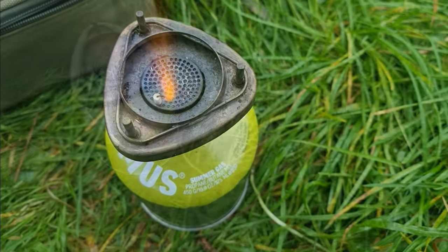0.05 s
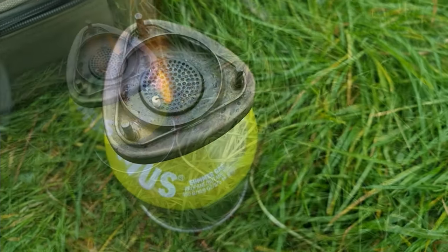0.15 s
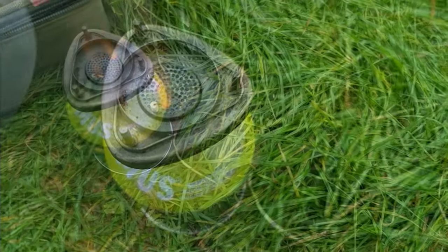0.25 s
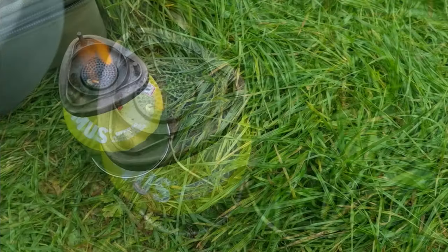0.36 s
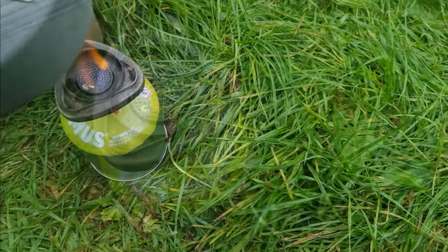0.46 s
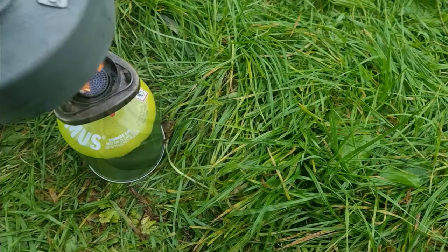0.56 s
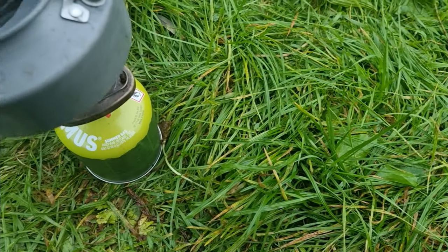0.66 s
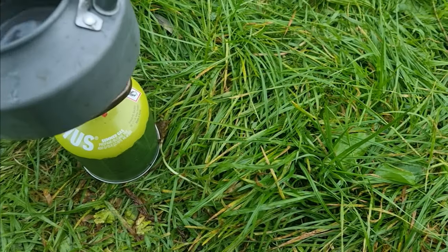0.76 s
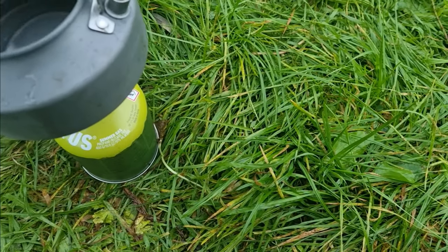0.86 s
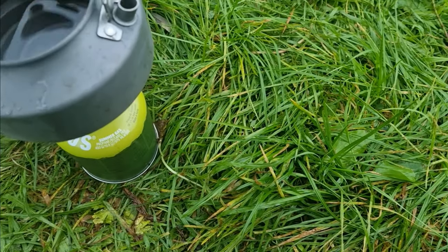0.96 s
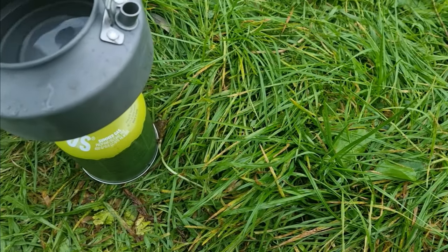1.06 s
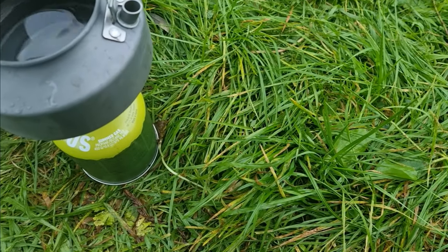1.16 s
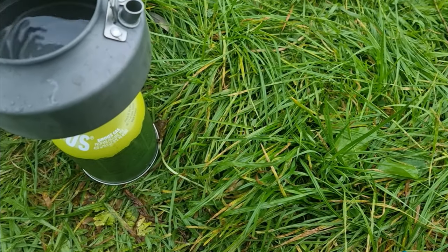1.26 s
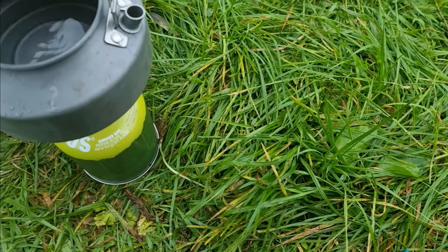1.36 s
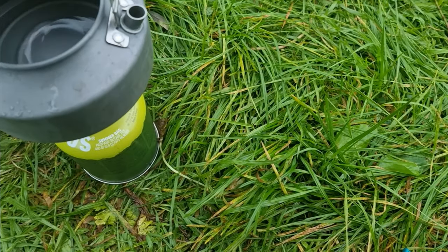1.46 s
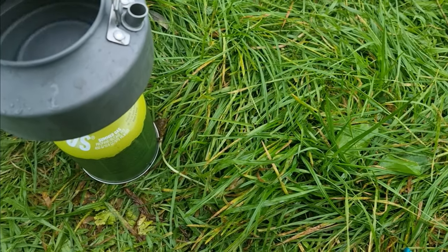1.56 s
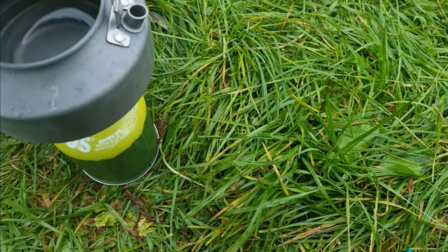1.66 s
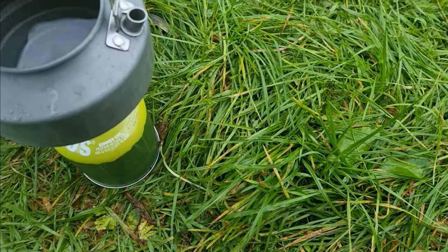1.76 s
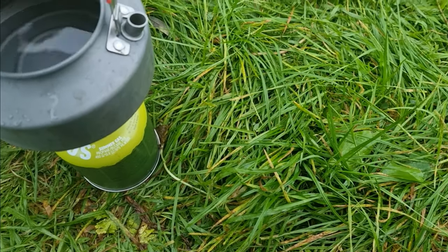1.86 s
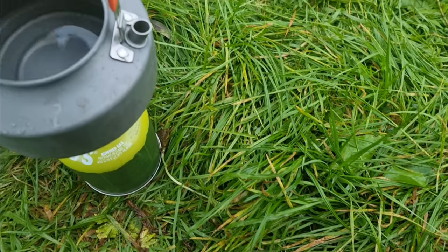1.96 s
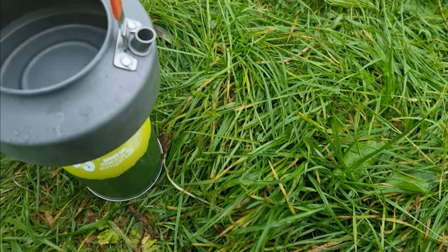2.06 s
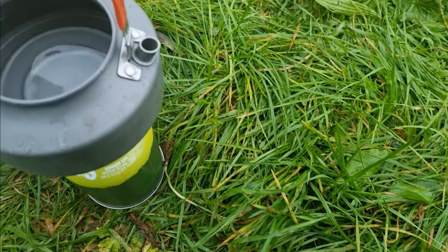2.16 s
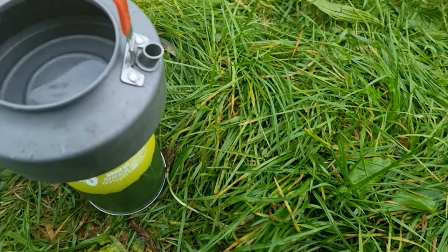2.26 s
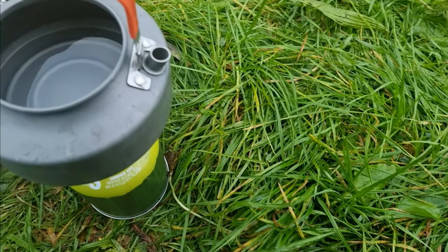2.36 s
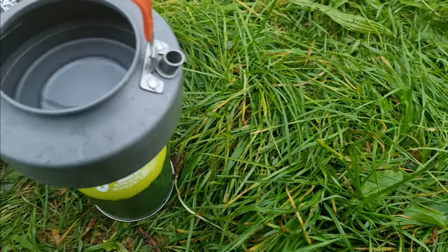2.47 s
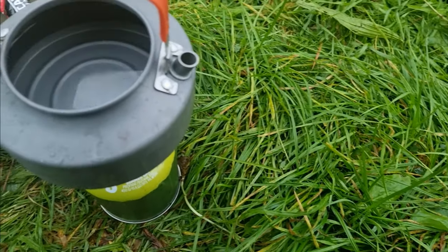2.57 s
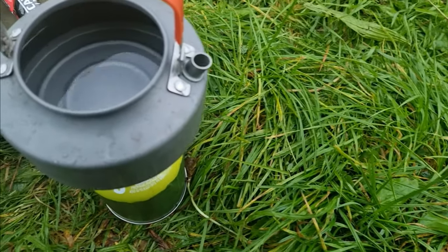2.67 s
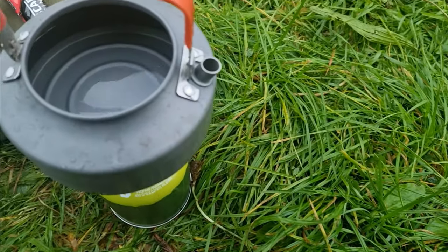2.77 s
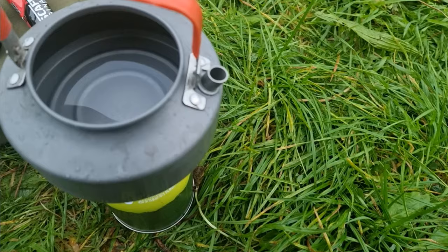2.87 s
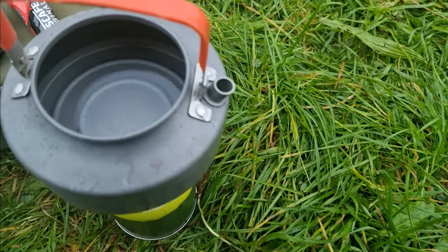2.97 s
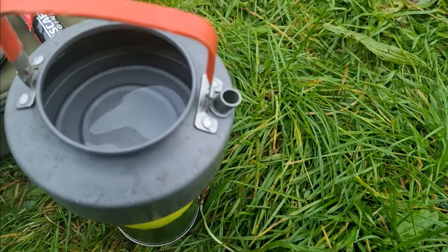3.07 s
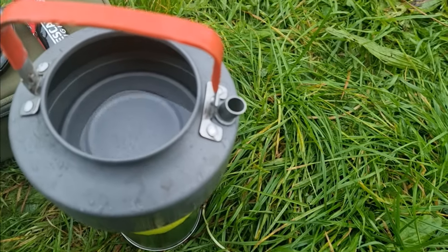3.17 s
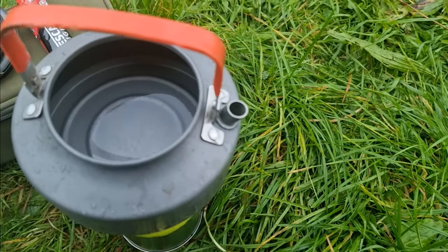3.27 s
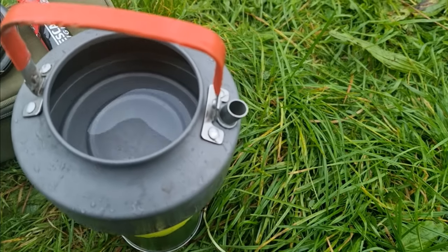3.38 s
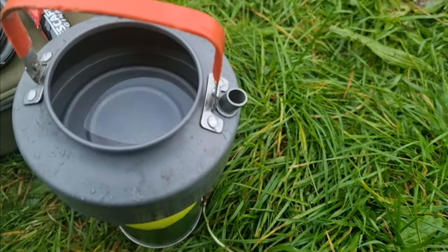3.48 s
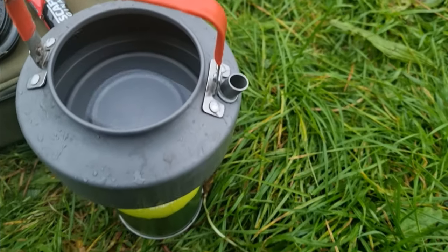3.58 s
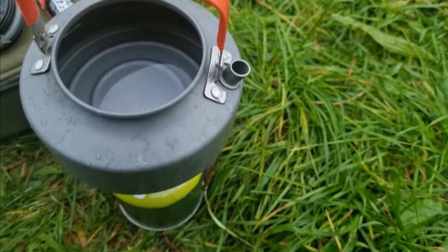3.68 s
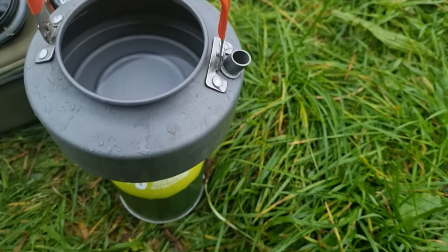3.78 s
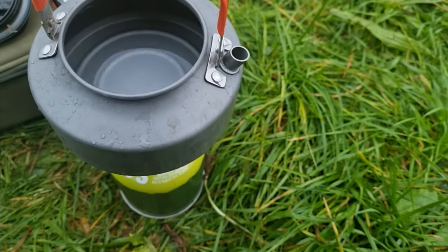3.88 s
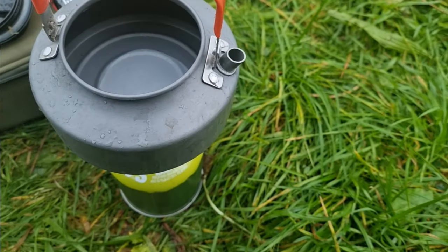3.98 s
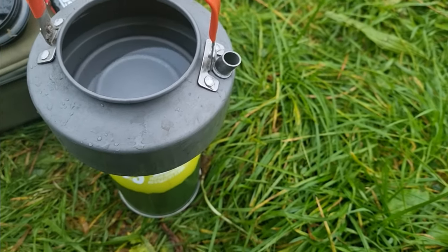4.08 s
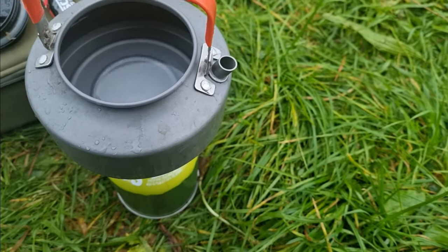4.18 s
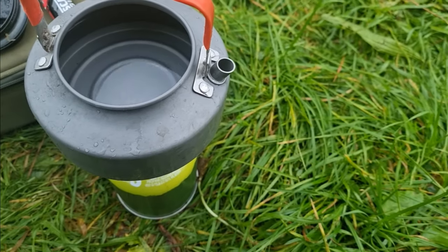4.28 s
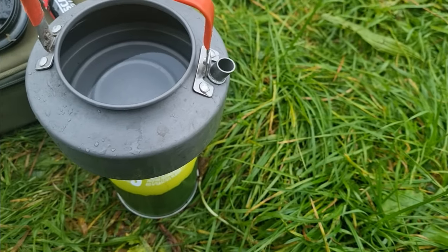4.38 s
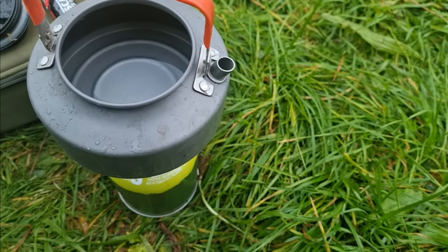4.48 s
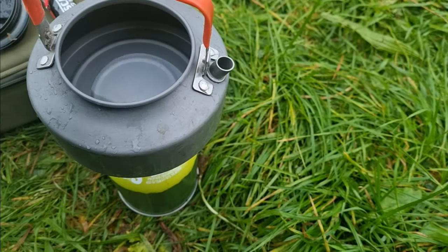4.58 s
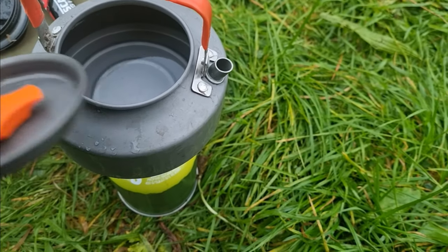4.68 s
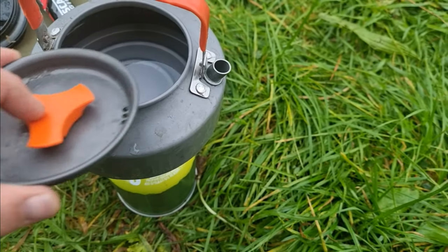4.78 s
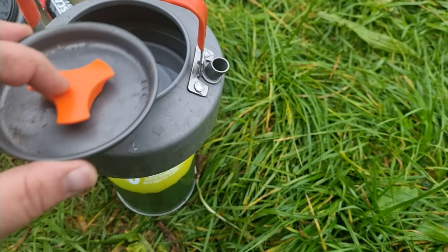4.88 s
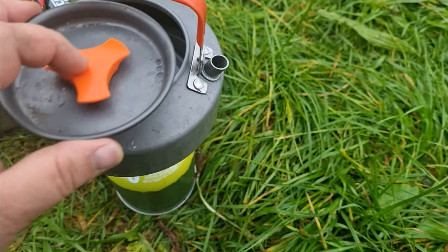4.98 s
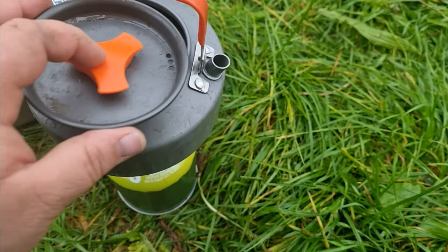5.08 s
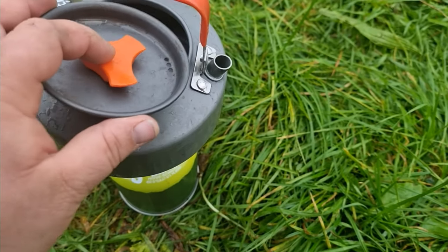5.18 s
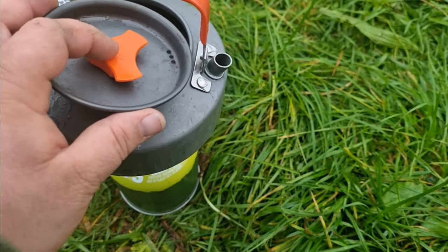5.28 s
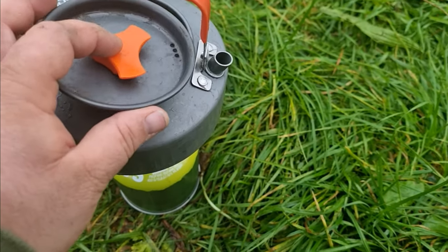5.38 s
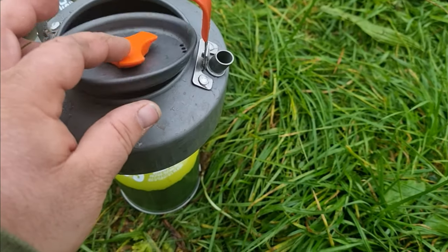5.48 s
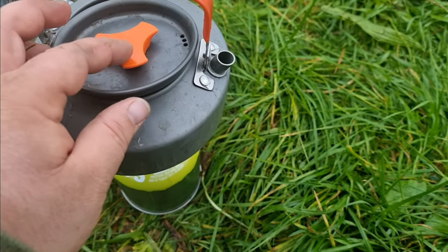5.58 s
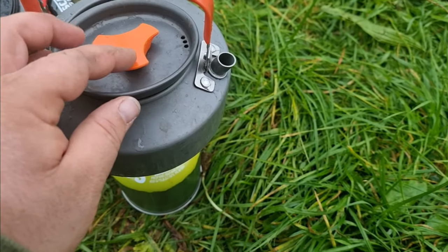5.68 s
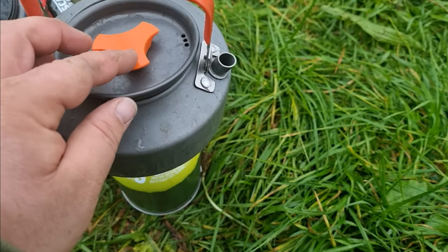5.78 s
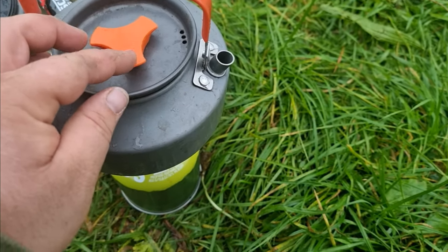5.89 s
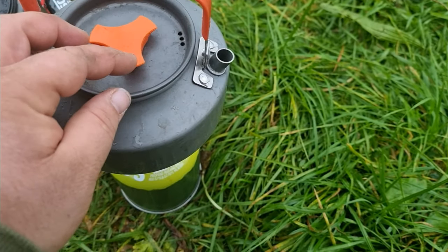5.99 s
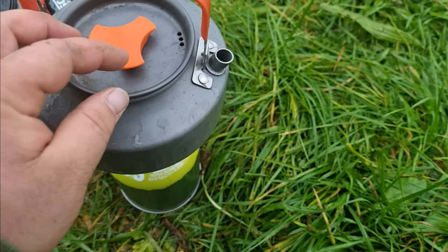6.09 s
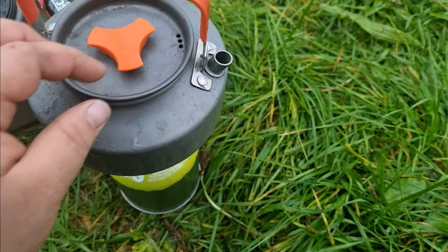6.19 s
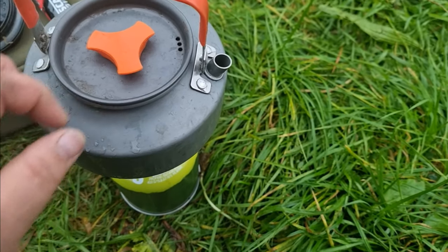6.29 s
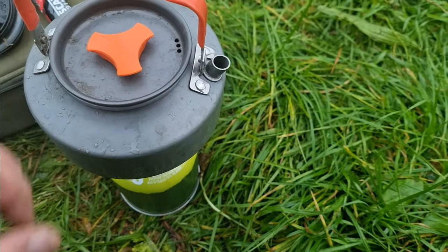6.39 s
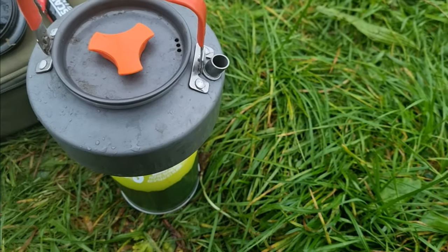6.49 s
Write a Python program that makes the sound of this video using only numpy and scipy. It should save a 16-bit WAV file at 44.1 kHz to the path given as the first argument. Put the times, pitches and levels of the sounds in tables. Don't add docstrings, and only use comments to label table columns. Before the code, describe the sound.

Close gas stove hiss with low flame rumble, one hollow metal clunk near one second, then a burst of lid rattling and a final hard click.

```python
import sys
import numpy as np
from scipy import signal
from scipy.fft import rfft, irfft
from scipy.io import wavfile
from scipy.ndimage import uniform_filter1d

SR = 44100
rng = np.random.default_rng(int(sys.argv[2]) if len(sys.argv) > 2 else 0)


def generate_wav(signal):
    frames = np.transpose(np.atleast_2d(signal))
    scaled = np.clip(frames, -1, 1) * 32767
    pcm = np.round(scaled).astype(np.int16)
    wavfile.write(sys.argv[1], SR, pcm)


N = 288414

# time_s, rumble_db
FLAME_LEVEL = [(0.0, -43), (0.05, -37.5), (0.2, -43), (0.27, -39.5), (0.33, -43.5), (0.44, -44.5),
               (0.49, -41.5), (0.6, -44.5), (0.65, -43.5), (0.78, -45.5), (0.82, -39), (0.87, -44),
               (1.13, -43.5), (1.24, -45), (1.33, -44.5), (1.42, -42.5), (1.55, -45), (1.78, -43.5),
               (2.18, -44.5), (2.24, -42.5), (2.31, -39.5), (2.35, -47), (2.4, -44), (2.42, -46),
               (2.6, -44), (2.64, -51), (2.71, -42), (2.75, -42.5), (3.02, -44.5), (3.06, -42), (3.22, -46),
               (3.28, -42), (3.31, -47), (3.35, -43), (3.44, -43), (3.7, -47.5), (3.86, -47), (3.92, -39),
               (3.97, -47), (4.02, -41), (4.08, -43), (4.15, -41), (4.19, -43), (4.35, -44), (4.48, -40),
               (4.53, -48.5), (4.66, -40.5), (4.73, -45.5), (4.81, -44), (4.94, -44.5), (4.97, -42),
               (5.08, -47), (5.21, -44), (5.26, -47.5), (5.61, -47), (5.66, -48.5), (6.01, -47),
               (6.08, -51.5), (6.16, -47), (6.28, -49.5), (6.38, -47), (6.54, -47.5)]
# frequency_hz, density_db_per_hz
RUMBLE_SPECTRUM = [(12, -65), (20, -31), (45, -6.5), (65, 4), (114, -9), (211, -10.5), (248, -12.5),
                   (288, -17), (334, -16), (500, -33.5), (650, -52), (1100, -120)]
# frequency_hz, coherence_0_to_1
PORT_LIKENESS = [(60, 1), (250, 0.74), (500, 1), (1500, 0.29), (3000, 0.83), (6000, 0.64), (9000, .65),
                 (15000, .5)]
# frequency_hz, phase_rad
PORT_PHASE = [(60, -0.85), (300, -.5), (600, -4.5), (900, -5), (1500, -3), (2200, -5.5), (2800, -5),
              (4000, -5), (5500, -4.5), (7500, -4.5), (10000, -8), (15000, -3.5)]

# start_s, blow_db, drum_pitch_hz, drum_db, sizzle_db, left_over_right_db
SET_DOWN = [
    (1.0788, -10, 789, -4.5, -19.5, 5),
]
# start_s, blow_db, drum_pitch_hz, drum_db, sizzle_db, left_over_right_db
BOUNCES = [
    (1.266, -19, 833, -26.5, -34, 3),
    (1.402, -39, 820, -49, -62, 3.6),
    (1.428, -36.5, 860, -42, -62, 3.7),
    (3.287, -47, 774, -74, -62, 5.0),
]
# start_s, blow_db, drum_pitch_hz, drum_db, sizzle_db, left_over_right_db
LID_KNOCKS = [(5.221, -23, 830, -61, -32, 6.8), (5.228, -6.5, 833, -24, -21, .6),
              (5.2374, -17, 800, -19, -45, 7.5), (5.434, -46, 800, -35, -58, 4.3),
              (5.4684, -19.5, 810, -38, -30, 8.2), (5.473, -14, 794, -46, -23, 7),
              (5.4765, -3, 715, -18, -17, .6), (5.4863, -11, 755, -45, -28, 4.0),
              (5.4964, -9, 765, -15, -17, 5.7), (5.5086, -4, 700, -34, -15, 4.6),
              (5.5121, -10, 732, -25, -20.5, 6.6), (5.5264, -8.5, 724, -24, -16.5, 4.7),
              (5.5374, -9.5, 690, -27, -22.5, 6.5), (5.5484, -10.5, 648, -23, -29, 5.5),
              (5.5652, -29, 650, -26, -39, 6.5), (5.9298, -22.5, 607, -40, -40, 6.6),
              (5.9481, -23, 580, -46, -42.5, 7.0), (5.9643, -10, 576, -37, -25, 11),
              (5.971, -1, 571, -25, -32, 3.6), (5.9811, -20, 599, -20.5, -17, 2.5),
              (5.9884, -9.5, 574, -23, -20.5, 3), (6.008, -7, 600, -37.5, -22.5, 8.6),
              (6.0174, -18.5, 693, -33, -50, 7.4)]
# start_s, blow_db, drum_pitch_hz, drum_db, sizzle_db, left_over_right_db
LID_TAPS = [
    (5.7234, -32, 703, -52, -38, 7.5),
    (5.7367, -32, 703, -39, -35, 13),
    (5.7845, -34, 690, -36, -45, 9.9),
    (5.729, -35, 650, -58, -50, 9.6),
    (5.885, -16, 830, -33, -30, 8.1),
]
# time_s, scrape_db, drum_pitch_hz
LID_SLIDES = [
    [(5.24, -26, 830), (5.3, -44, 816), (5.4, -51, 792.5), (5.46, -47, 785)],
    [(5.465, -30, 750), (5.49, -23.5, 690), (5.55, -28.5, 670), (5.58, -28.5, 630), (5.61, -39, 620),
     (5.66, -61, 616)],
    [(5.885, -26, 635), (5.93, -38.5, 594), (5.96, -31, 560), (5.975, -21.5, 566), (6.015, -20, 593),
     (6.04, -52, 670)],
]
# center_s, level_db, pitch_hz
HAND_THUMP = [
    (5.197, -31, 83.33),
]

# frequency_hz, level_db, t60_s
KETTLE_MODES = [(690, -21, 0.032), (772, -21, .3), (900, -15, 0.025), (1071, 2.5, 0.058),
                (1140, 0.5, 0.063), (1290, -2, .05), (1607, -23, 0.47), (1600, -2, 0.076),
                (2100, -8, 0.032), (2286, -4.5, 0.079), (2690, -12.5, 0.051), (3050, -11, .04),
                (3273, -10, .11), (3500, -6, 0.055), (4020, -20, .05)]
# frequency_hz, level_db, t60_s
ROCKING_MODES = [(782, -6, .12), (945, -9.5, 0.035), (1117, -3.5, 0.14), (1250, -7, 0.086),
                 (1584, -18, 0.23), (1785, -1, 0.054), (2375, -4.5, 0.079), (3300, -11, .04)]
# frequency_hz, level_db, t60_s
LID_MODES = [(1150, -9, 0.024), (1293, -12, 0.052), (1566, -12, 0.13), (1950, -3, 0.032), (2048, -7, 0.062),
             (2163, -8, 0.065), (2495, -7, 0.051), (2688, -1.5, 0.033), (2794, 1.5, 0.079),
             (2919, -2.5, 0.067), (3148, -2, 0.038), (3260, -10.5, 0.052), (3368, -8.5, .08),
             (3860, -15.5, .06), (4075, -9, 0.042), (4250, -18, 0.053), (4770, -13.5, 0.036),
             (5680, -9.5, 0.044)]
# frequency_hz, level_db, t60_s
HELD_LID_MODES = [(800, -6, 0.024), (1020, -7, 0.036), (1160, 2.5, 0.034), (1344, -2, 0.025),
                  (2000, -7, 0.027), (2694, 1, 0.045), (2880, -1.5, .05), (3180, -3, 0.067),
                  (3450, -2, 0.05), (4140, -6, 0.025)]
# frequency_hz, density_db_per_hz
SIZZLE_SPECTRUM = [(2060, -36.5), (3500, -2), (3660, -5.5), (4140, -8.5), (5000, -7), (5920, -1),
                   (6110, -6), (6830, -1), (8570, -14), (8910, -11.5), (11300, -16.5), (12900, -12),
                   (15400, -10), (16200, -19.5), (16500, -39.5)]

# time_s, cup_hiss_db, lower_jet_db, upper_jet_db, fizz_db, left_over_right_db
JET_LEVELS = [(0.0, -37.5, -45, -35, -56, -4.0), (0.09, -43, -44, -40.5, -55, -2.5),
              (0.18, -42.5, -45.5, -37, -58, -4.5), (0.27, -44.5, -44, -40.5, -55, -1.5),
              (0.42, -44, -46.5, -42, -58.5, 0.5), (0.67, -47, -51, -41, -57.5, 10),
              (0.76, -49.5, -45.5, -43.5, -57, 8), (0.95, -46.5, -49.5, -40, -55.5, 8.5),
              (1.09, -40.5, -52, -44.5, -56, 7), (1.2, -46.5, -49, -48, -55, 5),
              (1.24, -44.5, -47, -47, -54.5, 6), (1.6, -45, -48.5, -44.5, -53, 6.5),
              (1.82, -44, -47, -45.5, -53, 7.5), (1.99, -45, -45, -49, -53, 7.5),
              (2.15, -44, -46, -48, -54, 8.5), (2.35, -43.5, -48.5, -46, -57.5, 7),
              (2.6, -43, -47, -48.5, -57, 8.0), (2.73, -43, -50.5, -46.5, -56.5, 6.5),
              (2.95, -43, -48, -45, -54.5, 7.5), (3.15, -44, -46.5, -49, -54.5, 6),
              (3.35, -43, -47, -50, -54.5, 6), (3.57, -43.5, -49, -44, -54, 5),
              (3.93, -43.5, -45.5, -50, -57.5, 5.5), (4.08, -42, -46, -53.5, -54.5, 7.5),
              (4.33, -43.5, -48, -50, -58.5, 6), (4.55, -44, -47.5, -50.5, -58.5, 7),
              (4.79, -45, -49.5, -50, -56.5, 11.5), (4.94, -47, -53, -51, -56.5, 10),
              (5.08, -42, -45, -54, -57, 11), (5.17, -44, -51, -52, -59, 7),
              (5.19, -41, -46, -49, -56.5, 12), (5.28, -43, -50, -54, -76, 9),
              (5.32, -51.5, -54, -54, -65.5, 12), (5.41, -47.5, -52, -54, -63, 12),
              (5.45, -42.5, -53, -50, -63, 8), (5.55, -46, -66, -39, -58, 4.0),
              (5.65, -54, -58, -58, -65, 12), (5.83, -49.5, -51.5, -54, -63.5, 11),
              (5.94, -42, -49, -48, -60.5, 11), (6.03, -42.5, -55, -54.5, -70.5, 6),
              (6.1, -51.5, -55, -56.5, -64, 11), (6.21, -50.5, -55, -59, -64, 12),
              (6.34, -50, -59.5, -55.5, -61.5, 9), (6.39, -50, -54, -54.5, -62.5, 10),
              (6.54, -49, -51.5, -58.5, -60.5, 7)]
# center_hz, width_hz, level_db
JET_BANDS = [
    [(1300, 250, -17.5), (1954, 270, -8), (2545, 260, 2), (2896, 280, -0.5), (3700, 250, -15),
     (4100, 300, -9)],
    [(5432, 310, -2), (4780, 170, -17.5)],
    [(6493, 490, 1.5), (7380, 340, -3.5)],
    [(8100, 1600, 3.5), (10040, 700, 1.5), (11400, 515, -10.5), (12700, 490, -0.5), (13600, 860, -9),
     (14900, 1600, -1)],
]
# center_hz, width_hz, level_db
BARE_CUP_BAND = [(1350, 250, -4), (1900, 350, 0), (3720, 200, -1.5), (12340, 400, -12.5),
                 (14200, 700, -14.5)]
# time_s, level_db
BARE_CUP_LEVEL = [(0, -45), (.25, -45.5), (.45, -48.5), (.8, -55), (1.1, -59.5), (1.6, -78), (6.54, -106)]
# frequency_hz, density_db_per_hz
WASH_SPECTRUM = [(200, -1), (400, 0), (800, 2.5), (1100, -8), (1600, -14.5), (4500, -9), (8000, -30),
                 (11300, -25), (15500, -22), (15900, -50)]
# time_s, level_db
WASH_LEVEL = [(0, -48), (.3, -49.5), (.7, -53.5), (1.5, -56.5), (3.8, -54.5), (5.1, -54), (5.6, -54),
              (6.54, -62.5)]


def undb(db):
    return 10 ** (np.asarray(db) / 20)


def evened(x):
    return x / np.sqrt(np.mean(abs(x) ** 2) + 1e-20)


def read(points, hz):
    f, value = np.transpose(points)
    return np.interp(np.log(hz + 1), np.log(f + 1), value)


def add(mix, s, sound):
    part = mix[:, round(s * SR):][:, :sound.shape[1]]
    part += sound[:, :part.shape[1]]


def panned(db):
    return undb([[db / 2], [-db / 2]])


def ring(modes, t, spread_db=2.0, skew_rad=1.15):
    hz, db, t60 = np.transpose(modes)[:, :, None]
    spread = spread_db * rng.standard_normal((2, len(modes), 1))
    gain = undb(db + spread - 60 * t / t60)
    phase = skew_rad * rng.standard_normal((2, len(modes), 1))
    return (gain * np.sin(2 * np.pi * hz * t + phase)).sum(1)


def coloured(points, size, same):
    a, b = rng.standard_normal((2, size))
    pair = np.array([a, same * a + np.sqrt(1 - min(same, 1) ** 2) * b])
    shape = undb(read(points, np.fft.rfftfreq(size, 1 / SR)))
    return evened(irfft(rfft(pair) * shape, size))


def resonate(x, hz, width):
    turn = np.exp(2j * np.pi * np.cumsum(hz) / SR)
    r = np.exp(-np.pi * width / SR)
    return 2 * (turn * signal.lfilter([1 - r], [1, -r], x / turn)).real


def thump():
    s, db, hz = HAND_THUMP[0]
    half = 2000
    u = np.arange(-half, half) / SR * hz * np.pi
    pulse = (1 - 2 * u ** 2) * np.exp(-u ** 2)
    return s - half / SR, undb(db) * pulse * np.ones((2, 1))


def blow(modes, row, drum_t60, pair_hz, pair_db, rise_s, sizzle_t60, chatter_s):
    s, db, drum_hz, drum_db, sizzle_db, side_db = row
    t = np.arange(12000) / SR
    touch = t[:600]
    contact = rng.standard_normal(600) * np.exp(-touch / chatter_s)
    contact = contact + 9.7 * (touch == 0)

    swing = ring(modes, t) * (1 - np.exp(-t / .0004))
    walls = signal.fftconvolve(swing, contact[None])[:, :len(t)]
    walls = walls / abs(walls.mean(0)).max()

    pair = [(drum_hz, 0, drum_t60), (drum_hz + pair_hz, pair_db, 2.17 * drum_t60)]
    drum = ring(pair, t, spread_db=1.1, skew_rad=.3)
    drum = drum * (1 - np.exp(-t / rise_s)) * panned(-10.0)

    sizzle = coloured(SIZZLE_SPECTRUM, len(t), .05) * panned(-side_db / 2)
    sizzle = sizzle * undb(-60 * t / sizzle_t60) * (1 - np.exp(-t / .0015))

    sound = undb(db) * walls + undb(drum_db + 4) * drum + undb(sizzle_db + 5) * sizzle
    return s, sound * panned(side_db)


def slide(rows, slips_per_s=2500, spread_db=3.0):
    s, db, drum_hz = np.transpose(rows)
    t = np.arange(s[0], s[-1], 1 / SR)
    strength = undb(spread_db * np.minimum(rng.exponential(1, len(t)), 3.5))
    slips = strength * (rng.random(len(t)) < slips_per_s / SR)
    slips = slips * rng.choice([-1., 1.], len(t))

    lid = ring(LID_MODES, np.arange(4000) / SR)
    body = evened(signal.fftconvolve(slips[None], lid)[:, :len(t)])
    hz = np.interp(t, s, drum_hz)
    drum = evened(resonate(resonate(slips, hz, 97), hz, 220))
    grit = evened(coloured(SIZZLE_SPECTRUM, len(t), .05) * uniform_filter1d(abs(slips), 90))

    sound = body * panned(5.0) + undb(-7) * drum + undb(-16.5) * grit * panned(4.0)
    return s[0], sound * undb(np.interp(t, s, db)) * signal.windows.tukey(len(t), .15)


def flame(lumpy_db=0.8):
    lumps = evened(uniform_filter1d(uniform_filter1d(rng.standard_normal(N), 2500), 1200))
    level_db = np.interp(np.arange(N) / SR, *np.transpose(FLAME_LEVEL)) + lumpy_db * lumps
    return coloured(RUMBLE_SPECTRUM, N, .9) * undb(level_db)


def burner(patchy_db=1.5, comb_db=2.5, flutter_db=.5):
    frames, hz = N // 256 + 5, np.fft.rfftfreq(1024, 1 / SR)[:, None]
    t = np.arange(frames) * 256 / SR
    s, *columns = np.transpose(JET_LEVELS)
    *bands_db, side_db = (np.interp(t, s, c) for c in columns)
    bands_db.append(np.interp(t, *np.transpose(BARE_CUP_LEVEL)))

    a, b, c, d, e, f, patches, comb_left, comb_right = rng.standard_normal((frames, 513, 9)).T
    patches = evened(uniform_filter1d(uniform_filter1d(patches, 10, 0), 20, 1))
    combs = np.array([comb_left, comb_right])
    for size, axis in [(5, 1), (120, 2), (60, 2)]:
        combs = uniform_filter1d(combs, size, axis)
    combs = evened(combs)
    flutter = evened(uniform_filter1d(rng.standard_normal(frames), 4))

    power = 0
    for peaks, db in zip(JET_BANDS + [BARE_CUP_BAND], bands_db):
        band = sum(undb(top_db) ** 2 * np.exp(-((hz - centre) / width) ** 2) for centre, width, top_db in peaks)
        power = power + band / band.sum() * undb(db + flutter_db * flutter) ** 2

    same = np.clip(read(PORT_LIKENESS, hz), 0, 1)
    lag = np.exp(1j * read(PORT_PHASE, hz))
    left = a + 1j * b
    right = same * left * lag + np.sqrt(1 - same ** 2) * (c + 1j * d)
    treble = 1 / (1 + (1200 / (hz + 1)) ** 4)
    lean = undb(side_db * treble / (1 + (hz / 11000) ** 4) / 2)
    middle = np.sqrt(lean ** 2 + lean ** -2 + 2 * same * lag.real) / 2
    jet = np.array([left * lean, right / lean]) / middle * np.sqrt(power)
    jet = jet * undb(patchy_db * patches + comb_db * treble * (1 + hz / 20000) * combs)

    wash = undb(read(WASH_SPECTRUM, hz))
    wash = wash / np.linalg.norm(wash) * undb(np.interp(t, *np.transpose(WASH_LEVEL)))
    spectra = jet + np.array([e + 1j * f, c - 1j * a]) * wash
    return 1.03 * signal.istft(spectra, nperseg=1024, noverlap=768)[1][:, :N]


def scene():
    mix = burner() + flame()
    for row in SET_DOWN:
        add(mix, *blow(KETTLE_MODES, row, drum_t60=.11, pair_hz=23, pair_db=-16.5,
                       rise_s=.0049, sizzle_t60=.092, chatter_s=.003))
    for row in BOUNCES:
        add(mix, *blow(ROCKING_MODES, row, drum_t60=.11, pair_hz=-23, pair_db=-13,
                       rise_s=.0022, sizzle_t60=.046, chatter_s=.0038))
    for row in LID_KNOCKS:
        add(mix, *blow(LID_MODES, row, drum_t60=.061, pair_hz=-40, pair_db=-20,
                       rise_s=.0017, sizzle_t60=.048, chatter_s=.002))
    for row in LID_TAPS:
        add(mix, *blow(HELD_LID_MODES, row, drum_t60=.056, pair_hz=-35, pair_db=-10,
                       rise_s=.0021, sizzle_t60=.04, chatter_s=.0027))
    for rows in LID_SLIDES:
        add(mix, *slide(rows))
    add(mix, *thump())
    return mix


def top_cut(x):
    return signal.sosfilt(signal.butter(12, 17030, fs=SR, output="sos"), x)


def record(dry):
    full = np.clip(dry, -1, 1)
    edge = signal.firwin(601, 15820, window=("kaiser", 7), fs=SR)
    below = signal.oaconvolve(full, edge[None], "same")
    mix = below + undb(-30) * (full - below)
    return top_cut(mix)


dry = scene()
out = record(dry)
generate_wav(out)
```